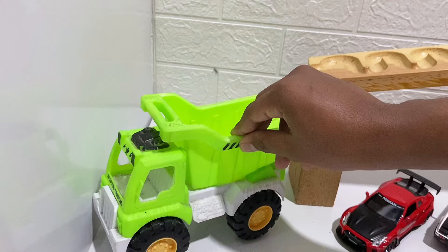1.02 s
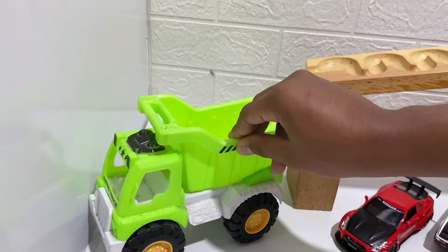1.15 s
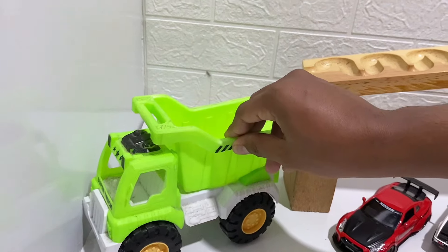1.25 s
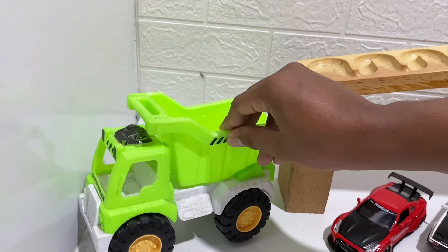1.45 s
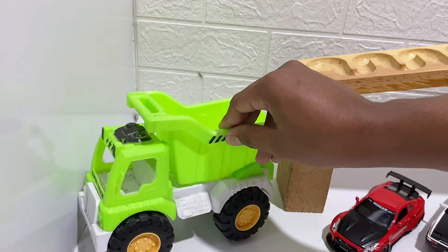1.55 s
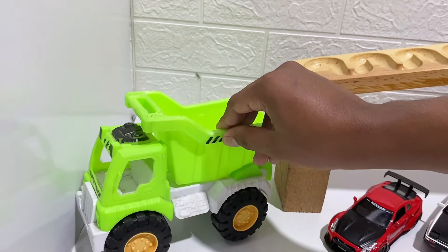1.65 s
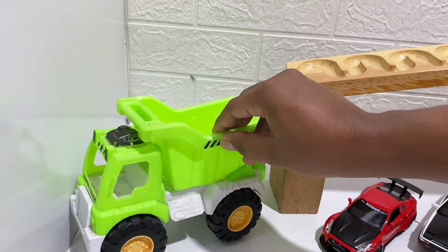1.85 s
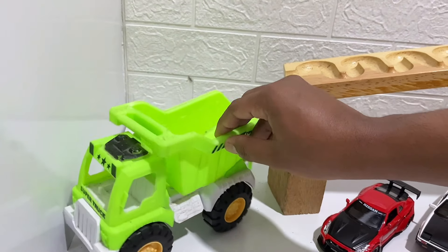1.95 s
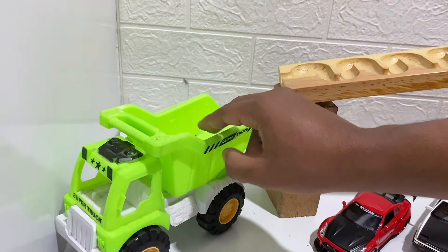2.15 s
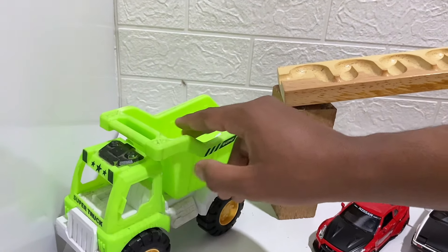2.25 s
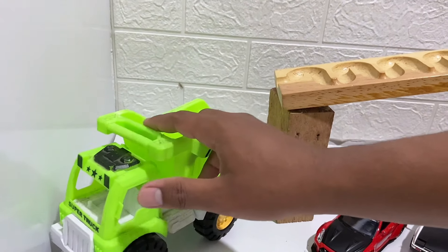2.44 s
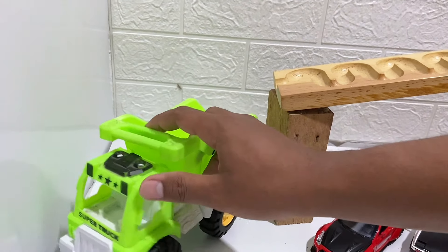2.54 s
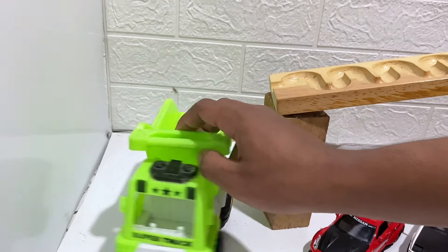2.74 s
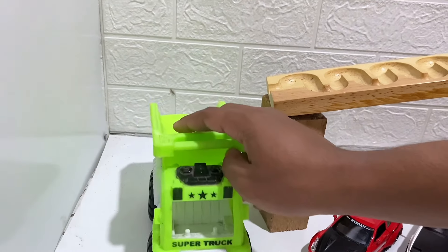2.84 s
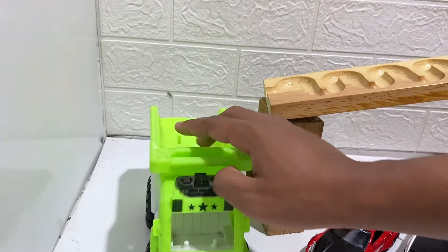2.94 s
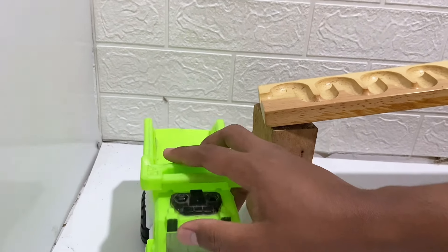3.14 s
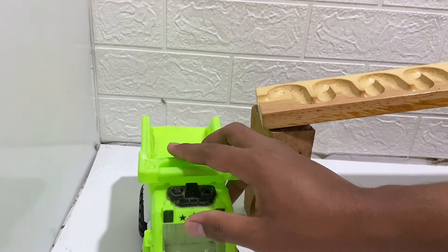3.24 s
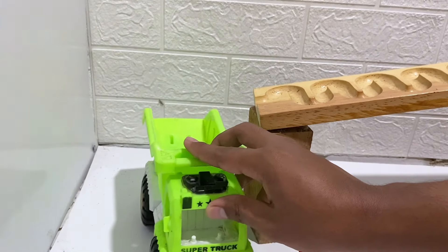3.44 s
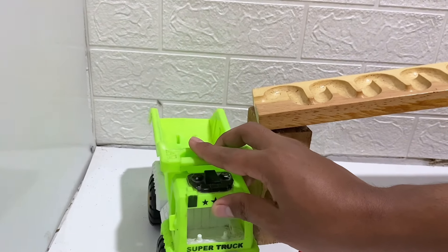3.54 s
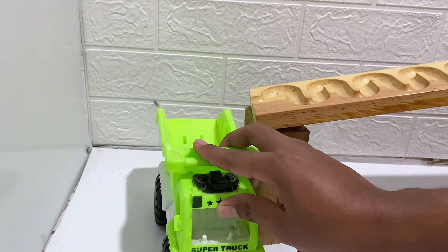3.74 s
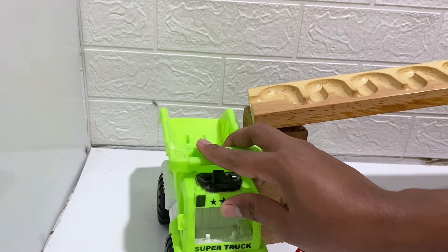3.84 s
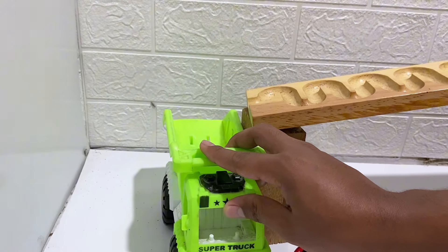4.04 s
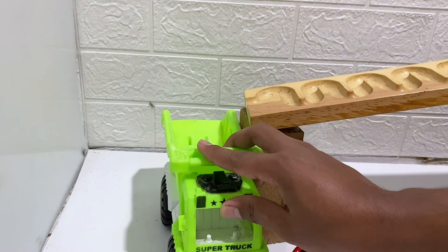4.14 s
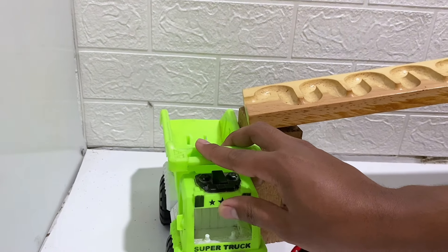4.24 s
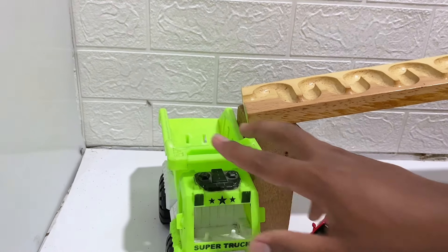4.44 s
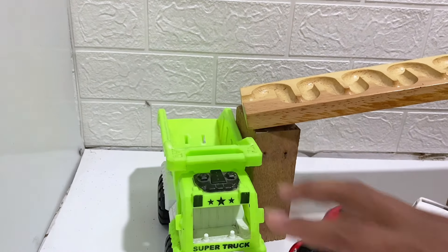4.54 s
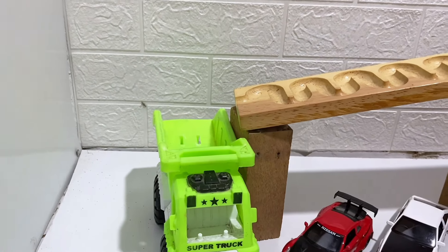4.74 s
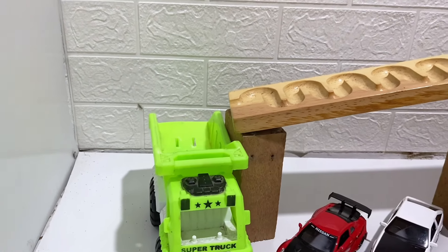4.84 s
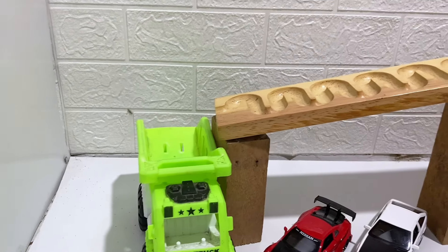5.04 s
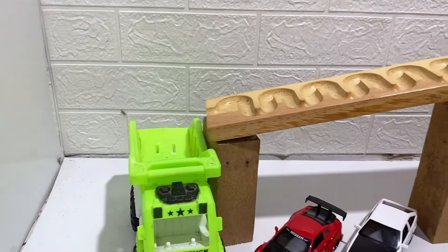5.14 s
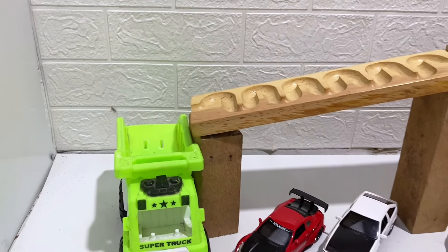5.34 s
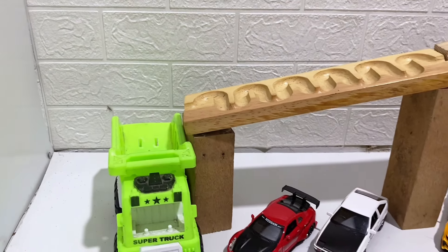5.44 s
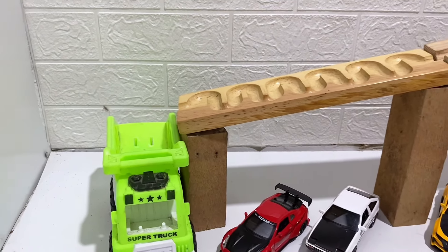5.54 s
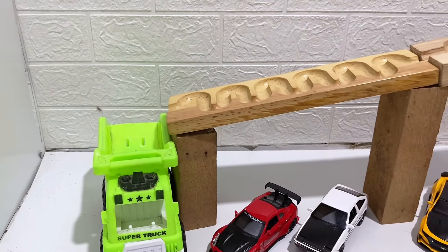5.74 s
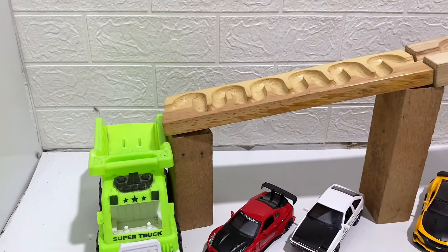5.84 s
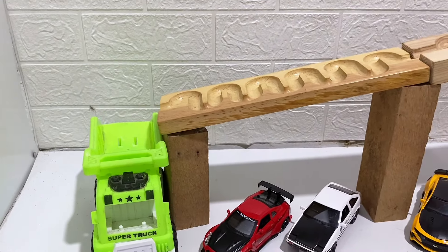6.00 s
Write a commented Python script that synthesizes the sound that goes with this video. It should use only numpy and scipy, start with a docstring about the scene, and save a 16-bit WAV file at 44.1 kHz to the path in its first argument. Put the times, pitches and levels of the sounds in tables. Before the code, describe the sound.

From the start, a toy scrapes softly along a wooden marble track and knocks against it in uneven clusters. The knocks are short, hollow and close, slightly to the left, the sharpest at about 0.3 seconds, with more around 1, 2 to 2.8 and 3.1 seconds. They thin out, ending with two faint taps by 4.5 seconds. Muffled traffic rumbles outside throughout: one low engine drones until about 3 seconds, then a second takes over, swelling around 4 to 5 seconds with a very faint whine and a tiny squeak. From about 6.2 seconds glass marbles click together in rapid, bright bursts, with a faint rustle as they settle. They pause briefly after 7.2 seconds, return densely at about 7.6 and continue, a little sparser, until 9 seconds. The room is small, with a short echo.

```python
"""A toy scrapes and knocks along a wooden marble track in a small tiled room, over a drone from the street.
Friction and impacts excite the damped modes of the wood. Outside, two engines pass one after the other,
each a harmonic series on its firing rate, with traffic rumble and a faint whine and squeak. From about
six seconds glass marbles click together in bursts, bright because each contact is so brief."""
import sys
import numpy as np
from scipy import signal
from scipy.fft import rfft, irfft, next_fast_len
from scipy.io import wavfile
from scipy.ndimage import uniform_filter1d, map_coordinates

SR = 44100
rng = np.random.default_rng(int(sys.argv[2]) if len(sys.argv) > 2 else 0)


def pcm_store(signal):
    """Save signal as 16-bit PCM."""
    levels = np.round(np.clip(np.atleast_2d(signal), -1, 1) * 32767)
    wavfile.write(sys.argv[1], SR, levels.astype(np.int16).T)


N = 400428

# Strokes of the toy along the wood: start_s, end_s, body_db, hiss_db
TOY_STROKES = [(0, 0.027, -46.5, -58), (0.32, 0.402, -48.5, -59.5), (0.397, 0.804, -50.5, -55),
               (0.718, 0.948, -47.5, -54.5), (1.022, 1.201, -49, -55.5), (1.53, 1.625, -54.5, -63.5),
               (1.785, 1.78, -55, -62.5), (2.009, 2.113, -45, -60), (2.24, 2.242, -42, -57),
               (2.59, 2.758, -50, -57), (2.754, 2.941, -49, -50), (3.04, 3.097, -56.5, -53.5),
               (3.12, 3.233, -54.5, -82), (3.315, 4.098, -58, -69.5)]
# Modes of the track: centre_hz, bandwidth_hz, gain_db
WOOD_MODES = [(370, 66, 7.5), (523, 280, 1.5), (715, 132, 3), (1031, 137, -0.5), (1573, 140, 2.5),
              (2010, 133, -6), (2430, 250, -9.5), (3062, 300, -11), (3513, 240, -12), (4980, 510, -17)]
# Contact noise of toy on wood: frequency_hz, density_db
HISS_SPECTRUM = [(1000, -16.5), (2500, -6), (5000, -5.5), (7500, -10.5), (10000, -6), (12200, -11.5),
                 (14500, -16.5), (16500, -43)]
# Speed of each engine: time_s, firing_hz
FIRST_ENGINE_RATE = [(.05, 28.7), (.8, 29.6), (1.6, 31.72), (2.1, 33.63), (3.3, 35.22)]
SECOND_ENGINE_RATE = [(3.2, 20.64), (3.9, 23.76), (4.1, 24.51), (4.8, 25.74), (5.7, 24.98), (6.1, 24.75),
                      (7.1, 23.28), (7.6, 26.13), (8.1, 27.1), (9.03, 27.04)]
# Swells of each engine, keyed by harmonic number: peak_s, peak_db, rise_db_per_s, fall_db_per_s
FIRST_ENGINE_SWELLS = {2: [(1.2, -33.5, 10.5, 13), (3.3, -42.5, 0, 3)], 3: [(.05, -43, 2, 7),],
                       4: [(.45, -40.5, 24, 19), (1.6, -41.5, 14, 21)]}
SECOND_ENGINE_SWELLS = {2: [(4.15, -39.5, 28, 3.9), (8.1, -35, 16.4, 5), (9.03, -33, 11, 8.4)],
                        3: [(4.8, -40.5, 11, 3.8), (5.7, -38.5, 4.2, 12), (6.6, -39, 46, 21.6)],
                        4: [(3.7, -32.5, 20.5, 58.5), (5.9, -39.5, 34.2, 34.09)],
                        5: [(4.75, -29, 12, 24.53), (8.6, -41.5, 43, 28.59)], 6: [(3.9, -33, 92.5, 91.8),
                        (5.2, -37, 13, 38.89)], 7: [(4.8, -46.5, 26.46, 24)],
                        11: [(8.02, -53, 27.2, 79.84)]}
# Traffic heard through the wall: time_s, rumble_db, wash_db
TRAFFIC_LEVELS = [(0, -41.5, -52), (1.8, -42.5, -52), (3.5, -40.5, -54), (5, -36.5, -53.5),
                  (6.2, -42.5, -58.5), (7.3, -40.5, -55.5), (9.08, -39, -50)]
# Deep rumble and broader wash of traffic: frequency_hz, density_db
RUMBLE_SPECTRUM = [(18, -35), (30, -9), (96, 3.5), (147, -2), (206, -15), (660, -120)]
WASH_SPECTRUM = [(150, -17), (220, -2.5), (360, -3), (600, -9.5), (2000, -23), (8000, -45), (16000, -52.5)]
# Blows on the track: start_s, level_db, tick_relative_db, pitch_hz
TRACK_KNOCKS = [(0.2981, -21.5, -18, 790), (.297, -17, -13, 2540), (0.318, -24.5, -15.5, 820),
                (0.5516, -32, 7, 1900), (0.555, -22.5, -12, 1620), (0.594, -36.5, 4, 2000),
                (0.5995, -22.5, -3, 1590), (0.773, -31, -29, 1590), (1.034, -26.5, -10.5, 830),
                (1.058, -20.5, -13, 790), (1.094, -27.5, -23, 510), (1.517, -29, -35.5, 401.3),
                (2.031, -24, -31, 615), (2.076, -34.5, 6.5, 1490), (2.088, -30.5, -3.5, 1490),
                (2.142, -21, -17, 960), (2.165, -21.5, -21, 574), (2.223, -33.5, -8, 1091),
                (2.248, -25.5, -20, 790), (2.27, -27, -37.5, 1010), (2.312, -53, -4, 5000),
                (2.52, -29.5, -20.5, 936), (2.552, -26, -21.5, 453), (2.614, -25.5, -28.5, 550),
                (2.683, -46, 12, 1550), (2.777, -24, -27, 690), (3.003, -35, -11.5, 920),
                (3.013, -29.5, -28, 422), (3.072, -29, -7, 1633), (3.079, -20.5, -13, 810),
                (3.091, -22.5, -33, 740), (3.111, -28, -45, 810), (3.135, -28, -38, 820),
                (3.221, -42.5, 1.5, 2660), (3.412, -28, -20, 900), (4.094, -35.5, -16, 724),
                (4.437, -39.5, -10.5, 2120)]
# A faint whine and a brief squeak from the street: time_s, pitch_hz, level_db
STREET_WHINE = [(4.3, 756.2, -71.5), (4.85, 798, -62.5), (6.1, 798.6, -69)]
STREET_SQUEAK = [(4.76, 4050, -78), (4.84, 3990, -77)]
# Collisions of glass on glass: start_s, level_db, pitch_hz
MARBLE_CLICKS = [(6.1597, -40.5, 6510), (6.1831, -36.5, 7030), (6.247, -30.5, 7710), (6.2619, -18.5, 10200),
                 (6.2705, -19.5, 4230), (6.325, -32.5, 4830), (6.3328, -32.5, 4910), (6.4021, -28.5, 3310),
                 (6.4106, -20.5, 10200), (6.4381, -21.5, 10400), (6.456, -26, 3040), (6.4723, -20, 6850),
                 (6.4996, -17.5, 4000), (6.5069, -17, 6260), (6.519, -14.5, 9950), (6.5417, -18.5, 6980),
                 (6.5546, -23.5, 9750), (6.56, -13.5, 7020), (6.6146, -28.5, 9930), (6.6286, -32, 9210),
                 (6.637, -24, 10300), (6.677, -24, 10600), (6.6898, -30.5, 3420), (6.7378, -29.5, 10200),
                 (6.7815, -23, 10100), (6.789, -21.5, 4640), (6.8337, -25.5, 10500), (6.8656, -33, 11100),
                 (6.8774, -33, 5950), (6.9111, -25.5, 10300), (6.9334, -36.5, 9920), (6.9895, -21.5, 8860),
                 (7.014, -24, 6120), (7.0529, -31, 6710), (7.0728, -25, 10700), (7.1591, -30.5, 7040),
                 (7.4953, -39, 10300), (7.5224, -29, 7340), (7.595, -33.5, 4250), (7.6598, -28.5, 6940),
                 (7.668, -27, 6220), (7.692, -18.5, 6490), (7.7037, -20.5, 9940), (7.7163, -15, 6580),
                 (7.7334, -17.5, 5020), (7.8072, -21, 9290), (7.83, -26.5, 6910), (7.8391, -16, 9630),
                 (7.8581, -23.5, 10200), (7.876, -26.5, 4380), (7.9724, -28.5, 4390), (8.0591, -37.5, 4400),
                 (8.1229, -29, 7190), (8.1543, -30.5, 4370), (8.1845, -19, 9580), (8.192, -21.5, 9430),
                 (8.2068, -22, 10300), (8.2262, -23.5, 5700), (8.2535, -22, 10300), (8.2778, -25.5, 9770),
                 (8.2863, -19, 7560), (8.307, -30.5, 7130), (8.3607, -32, 3740), (8.3703, -26.5, 9720),
                 (8.5024, -38.5, 6290), (8.541, -38.5, 4510), (8.5577, -27, 4240), (8.5711, -26, 9950),
                 (8.6175, -29, 9930), (8.6651, -29.5, 6220), (8.6782, -28.5, 9710), (8.732, -36.5, 9100),
                 (8.7926, -29, 4320), (8.8006, -24.5, 4490), (8.9792, -27, 10500)]
# Contact noise of the marbles: frequency_hz, density_db
GLASS_SPECTRUM = [(1000, -13.5), (2000, -3), (3000, 3.5), (6500, 7), (10000, 8.5), (12500, 0.5),
                  (14000, -5), (16500, -36.5)]
# Reverberation time of the room: frequency_hz, t60_s
ROOM_DECAY = [(300, 0.42), (2500, 0.223), (7000, 0.31), (14000, 0.031)]
# Left-right likeness of the room's field: frequency_hz, coherence_ratio
FIELD_COHERENCE = [(100, 1), (200, 0.86), (380, 0.33), (1000, 0.022), (4000, 0.094), (10000, 0.81)]
# Phase of the left channel ahead of the right: frequency_hz, lead_rad
LEFT_PHASE_LEAD = [(3000, 1), (6600, 1.12), (8500, -3.5), (10200, -5.5), (12200, -10.5), (16200, -12.5)]


def amp(db):
    """Amplitude grows tenfold for every 20 dB."""
    return 10 ** (np.asarray(db) / 20)


def unit(x):
    """Normalisation to an rms of 1."""
    return x / np.sqrt(np.mean(x ** 2) + 1e-20)


def along(points, hz):
    """Interpolation of (frequency_hz, value) points on a logarithmic frequency axis."""
    knots_hz, values = np.transpose(points)
    return np.interp(np.log(hz + 1), np.log(knots_hz + 1), values)


def spectrum(points):
    """Amplitude response through (frequency_hz, density_db) points."""
    return lambda hz: amp(along(points, hz))


def curves(rows, fade_s=.1):
    """Linear interpolation of each column over time, with a gate that fades outside the rows' span."""
    times, *columns = np.transpose(rows)
    t = np.arange(N) / SR
    gate = np.clip(np.minimum(t - times[0], times[-1] - t) / fade_s + 1, 0, 1)
    return [np.interp(t, times, column) for column in columns], gate


def ridge(start_s, end_s, db, rise, fall):
    """Exponential growth and decay: straight slopes in dB per second on either side of a held level."""
    t = np.arange(N) / SR
    return db - rise * np.clip(start_s - t, 0, None) - fall * np.clip(t - end_s, 0, None)


def wobble(rate_hz):
    """Smooth random fluctuation: a spline through rate_hz Gaussian values a second."""
    knots = rng.standard_normal(int(N * rate_hz / SR) + 4)
    return map_coordinates(knots, [np.arange(N) * rate_hz / SR])


def filtered(x, response):
    """Linear filtering multiplies the spectrum by a complex frequency response."""
    size = next_fast_len(N + SR // 2)
    return irfft(rfft(x, size) * response(np.fft.rfftfreq(size, 1 / SR)), size)[..., :N]


def spread(pair, response, min_coherence=.51):
    """The mid-side balance of two filtered noises sets their coherence, kept high for near sources."""
    def mid_side_response(hz):
        angle = np.arccos(np.clip(np.maximum(along(FIELD_COHERENCE, hz), min_coherence), -1, 1)) / 2
        return response(hz) * [np.cos(angle), np.sin(angle)]
    mid, side = filtered(pair, mid_side_response)
    return np.array([mid + side, mid - side])


def grit(rate_hz, depth_db):
    """Random amplitude modulation roughens a pair of white noises."""
    return amp(depth_db * wobble(rate_hz)) * rng.standard_normal((2, N))


def patchy(pair, depth_db):
    """Modulation in time and frequency: bands of the noise swell and fade at random."""
    bands = signal.stft(pair, nperseg=256)[2]
    field = uniform_filter1d(rng.standard_normal(bands.shape[1:]), size=3, axis=0)
    field = uniform_filter1d(field, size=12, axis=1)
    return signal.istft(bands * amp(depth_db * unit(field)), nperseg=256)[1][:, :N]


def bursts(times, levels_db, t60_s, rise_s):
    """Impact noise: each decaying stereo burst is grainy, like several small contacts."""
    out, t = np.zeros((2, N + SR)), np.arange(2100) / SR
    for s, db in zip(times, levels_db):
        grain_db = 3.5 * np.repeat(rng.standard_normal(len(t) // 30), 30)
        envelope = amp(grain_db * (t > 2 * rise_s) - 60 * t / t60_s) * (1 - np.exp(-(t / rise_s) ** 2))
        burst = envelope * rng.standard_normal((2, len(t)))
        burst *= amp(db) * np.linalg.norm(envelope) / np.linalg.norm(burst[0])
        out[:, round((s - rise_s / 2) * SR):][:, :len(t)] += burst
    return out[:, :N]


def wood(hz):
    """Modal superposition: the track responds as a sum of damped resonators of alternating sign."""
    return sum((-1) ** k * amp(db) * 1j * hz * width / (centre ** 2 - hz ** 2 + 1j * hz * width)
               for k, (centre, width, db) in enumerate(WOOD_MODES))


def snags(per_s=160, mean_jump=.6, decay_s=.002):
    """Surface roughness: friction jumps at random rough spots and relaxes exponentially."""
    jumps = (rng.random(N) < per_s / SR) * rng.exponential(1, N)
    return 1 + mean_jump * signal.lfilter([1], [1, -np.exp(-1 / (decay_s * SR))], jumps)


def sliding(press_db_per_s=275, lift_db_per_s=225.5, hiss_steeper=1.77):
    """Stick-slip friction drives the modes of the wood and hisses at the contact."""
    slopes = np.array([press_db_per_s, lift_db_per_s])
    body_db = np.max([ridge(start, end, db, *slopes) for start, end, db, _ in TOY_STROKES], axis=0)
    hiss_db = np.max([ridge(start, end, db, *(hiss_steeper * slopes))
                      for start, end, _, db in TOY_STROKES], axis=0)
    hand_pressure = amp(1.1 * wobble(12))
    roughness = snags()
    body = amp(body_db) * unit(spread(roughness * grit(120, 2.5), wood))
    contact = patchy(roughness * grit(150, .97), depth_db=2)
    hiss = amp(hiss_db) * unit(spread(contact, spectrum(HISS_SPECTRUM)))
    return hand_pressure * (body + hiss)


def engine(rates, swells, drop_db):
    """Periodic firing gives a harmonic series, slightly unsteady in level and phase."""
    (firing_hz,), gate = curves(rates)
    levels = {k: np.max([ridge(s, s, db, rise, fall) for s, db, rise, fall in peaks], axis=0)
              for k, peaks in swells.items()}
    # Upper harmonics without swells of their own follow the second, more weakly.
    upper = {k: levels[2] - drop_db - 1.27 * k + 4 * wobble(1.2) for k in range(5, 13)}
    phase = 2 * np.pi * np.cumsum(firing_hz) / SR
    return gate * sum(np.sqrt(2) * amp(db + wobble(5.7)) * np.sin(k * phase + .62 * wobble(4))
                      for k, db in (upper | levels).items())


def traffic():
    """Distant traffic adds incoherently into noise; mostly its low frequencies pass the wall."""
    (rumble_db, wash_db), _ = curves(TRAFFIC_LEVELS)
    rumble = spread(grit(3.3, .34), spectrum(RUMBLE_SPECTRUM), min_coherence=0)
    shifting_noise = patchy(rng.standard_normal((2, N)), depth_db=1.5)
    wash = spread(shifting_noise, spectrum(WASH_SPECTRUM), min_coherence=0)
    return amp(rumble_db) * unit(rumble) + amp(wash_db) * unit(wash)


def knocks(rise_s=.0016, falloff_db_per_octave=15):
    """Free vibration: a blow rings the wood's modes, favouring those near its pitch."""
    out, t = np.zeros((2, N + SR)), np.arange(SR // 10) / SR
    mode_hz, width_hz, mode_db = np.transpose(WOOD_MODES)[:, :, None]
    for s, db, _, pitch_hz in TRACK_KNOCKS:
        falloff_db = falloff_db_per_octave * np.abs(np.log2(mode_hz / pitch_hz))
        strength = amp(mode_db - falloff_db + rng.normal(0, 2, mode_hz.shape))
        envelope = strength * np.exp(-np.pi * width_hz * t)
        phase = 2 * np.pi * mode_hz * (1 + rng.normal(0, .02, mode_hz.shape)) * t
        phase += 2 * np.pi * rng.random(mode_hz.shape)
        lead_rad = rng.normal(0, 1, mode_hz.shape)  # each mode reaches left and right out of step
        ring = [np.sum(envelope * np.sin(phase + side * lead_rad), axis=0) for side in (.5, -.5)]
        uneven_db = 3 * map_coordinates(rng.standard_normal(64), [400 * t])
        blow = ring * (1 - np.exp(-(t / rise_s) ** 2)) * amp(uneven_db)
        out[:, round(s * SR):][:, :len(t)] += amp(db) * 6 * blow / np.linalg.norm(blow[0])
    return out[:, :N]


def ticks():
    """A hard edge adds a broadband transient to each knock, coloured by the wood's resonances."""
    times, db, tick_db, _ = np.transpose(TRACK_KNOCKS)
    contacts = bursts(times, db + tick_db + 9.5, t60_s=.027, rise_s=.0012)
    return spread(contacts, lambda hz: amp(along(HISS_SPECTRUM, hz)) * (.67 + amp(9) * np.abs(wood(hz))))


def room(x, shared_energy=.75, delay_samples=60):
    """Reverberation: each frequency dies at its own rate; each quarter second excites a new random tail."""
    out, step = np.zeros((2, N + 2 * SR)), SR // 4
    for start in range(0, N, step):
        hz, t, bands = signal.stft(rng.standard_normal((2, SR // 3)), SR, nperseg=128)
        decay = amp(-60 * t / along(ROOM_DECAY, hz)[:, None])
        mid, side = signal.istft(bands * decay, SR, nperseg=128)[1]
        tail = np.sqrt(shared_energy) * mid + np.sqrt(1 - shared_energy) * side * [[1], [-1]]
        wet = signal.fftconvolve(x[:1, start:start + step], tail / np.linalg.norm(mid), axes=1)
        out[:, start + delay_samples:][:, :wet.shape[1]] += wet
    return out[:, :N]


def whine(rows, rasp_hz):
    """Random amplitude and phase modulation broaden a gliding tone into narrow-band noise."""
    (pitch_hz, db), gate = curves(rows)
    envelope = gate * amp(db + 3.7 * wobble(30))
    return envelope * np.sin(2 * np.pi * np.cumsum(pitch_hz) / SR + 3.3 * wobble(rasp_hz))


def marbles(rebounds=5, split_hz=5920, tilt_db_per_octave=2.5):
    """Brief impacts have broad spectra; hard, crowded ones shake neighbours into rebounds and chatter."""
    start_s, db, pitch_hz = np.transpose(MARBLE_CLICKS)
    crowding = np.sum(np.exp(-np.abs(start_s[:, None] - start_s) / .0158), axis=1) - 1
    shaken_db = db + .069 * (db - db.max()) - 7 * np.exp(-2 * crowding)
    lateness, weakness = np.transpose(rng.random((len(start_s), rebounds, 2)), (2, 0, 1))
    times = np.append(start_s, start_s[:, None] + .0013 + .014 * lateness)
    levels_db = np.append(db, shaken_db[:, None] - 12 * lateness - 9 * weakness) + 10
    # Clicks pitched above the split are thinner and brighter, those below it fuller and duller.
    tilt_db = tilt_db_per_octave * np.log2(np.append(pitch_hz, np.repeat(pitch_hz, rebounds)) / split_hz)
    dull = bursts(times, levels_db - tilt_db, t60_s=.0028, rise_s=.0006)
    bright = bursts(times, levels_db + tilt_db, t60_s=.0028, rise_s=.0006)
    glass = spectrum(GLASS_SPECTRUM)
    low_share = lambda hz: 1 / (1 + (hz / split_hz) ** 4)
    snap = spread(dull, lambda hz: glass(hz) * np.sqrt(low_share(hz)))
    snap += spread(bright, lambda hz: glass(hz) * np.sqrt(1 - low_share(hz)))
    chatter = bursts(start_s, shaken_db - 7.5, t60_s=.029, rise_s=.0015)
    return snap + spread(chatter, lambda hz: glass(hz) * 7000 / (7000 + 1j * hz))


def pings(relative_db=-11, t60_s=.0075, rise_s=.00048):
    """Damped oscillation: each marble click rings briefly at its own pitch."""
    out, t = np.zeros(N + SR), np.arange(SR // 20) / SR
    for s, db, pitch_hz in MARBLE_CLICKS:
        envelope = amp(db + relative_db - 60 * t / t60_s) * (1 - np.exp(-t / rise_s))
        out[round(s * SR):][:len(t)] += envelope * np.sin(2 * np.pi * pitch_hz * t)
    return out[:N]


def rustle(t60_s=.7):
    """Relaxation: the heap of marbles keeps shifting faintly after each click, settling exponentially."""
    start_s, db, _ = np.transpose(MARBLE_CLICKS)
    frames = np.arange(0, N, 64)
    since_s = frames[:, None] / SR - start_s
    stirred = np.sum((since_s > 0) * amp(.59 * db - 60 * np.abs(since_s) / t60_s), axis=1)
    envelope = amp(-56.5) * np.interp(np.arange(N), frames, stirred)
    return envelope * unit(spread(grit(200, 3.8), spectrum(GLASS_SPECTRUM)))


def scene():
    """Superposition of direct sound, echoes and street; a level difference sets the track a little left."""
    track = knocks() + ticks()
    glass = marbles() + pings()
    direct = (track + sliding()) * amp([[1.5], [-1.5]]) + (glass + rustle()) * amp([[.4], [-.4]])
    echoes = room(amp(-9) * track + amp(-12.5) * glass)
    street = traffic() + engine(FIRST_ENGINE_RATE, FIRST_ENGINE_SWELLS, drop_db=23.5)
    street += engine(SECOND_ENGINE_RATE, SECOND_ENGINE_SWELLS, drop_db=14)
    street += whine(STREET_WHINE, rasp_hz=40) + whine(STREET_SQUEAK, rasp_hz=110)
    return direct + echoes + street


def record(dry):
    """Phase shift and band limit: left and right agree in the bass and fall out of step in the treble."""
    top_hz = 16500
    knots_hz, lead_rad = np.transpose(LEFT_PHASE_LEAD)
    lead = lambda hz: np.interp(hz, [0, *knots_hz], [0, *lead_rad])
    return filtered(dry, lambda hz: np.exp(.5j * lead(hz) * [[1], [-1]]) * (hz < top_hz))


dry = scene()
out = record(dry)
pcm_store(out)
```